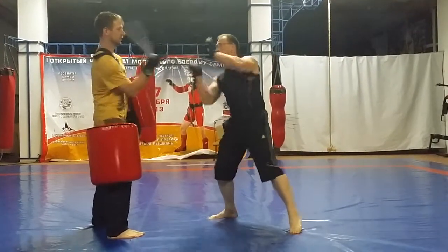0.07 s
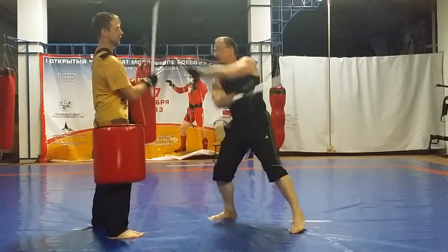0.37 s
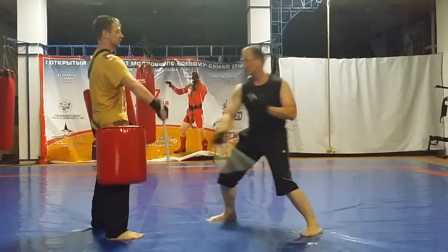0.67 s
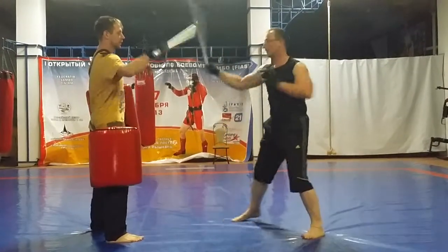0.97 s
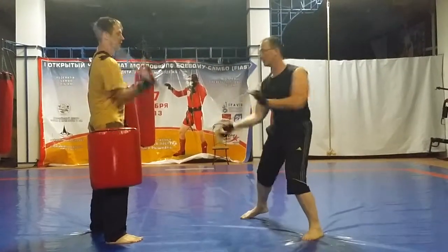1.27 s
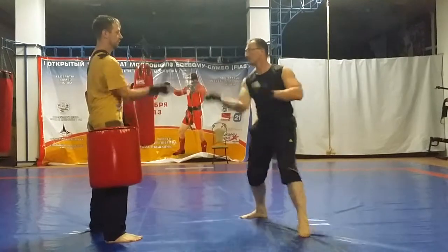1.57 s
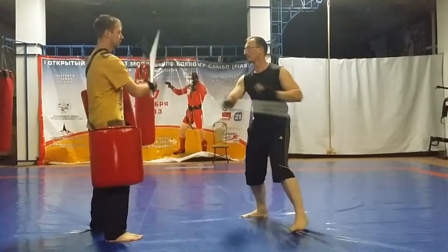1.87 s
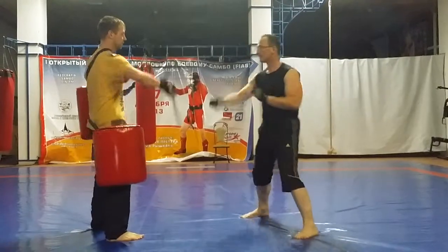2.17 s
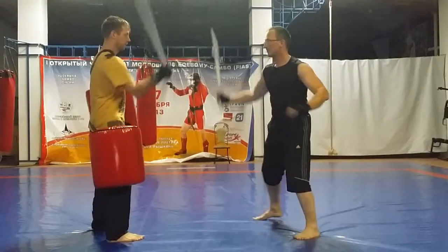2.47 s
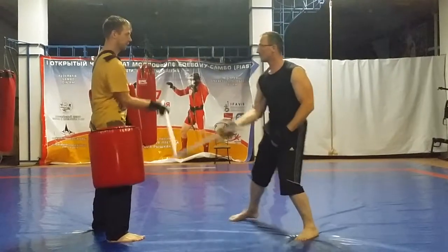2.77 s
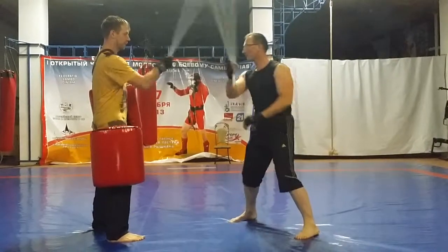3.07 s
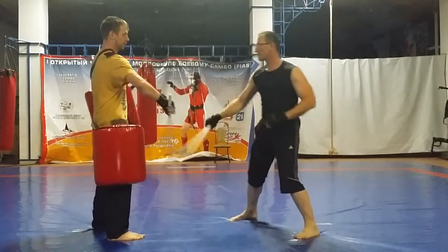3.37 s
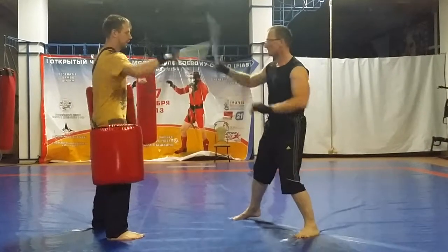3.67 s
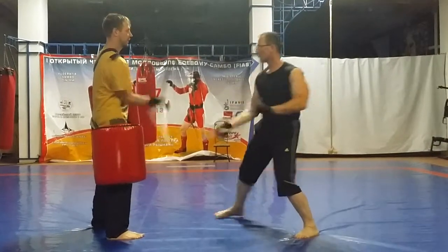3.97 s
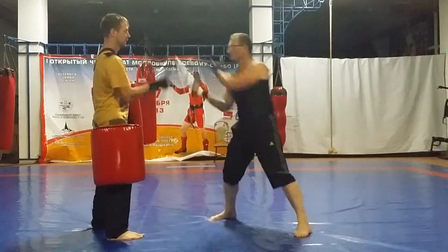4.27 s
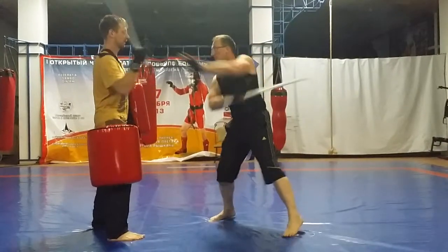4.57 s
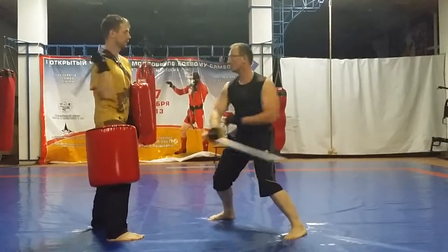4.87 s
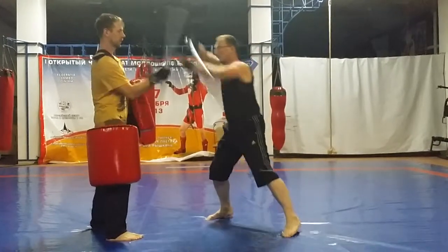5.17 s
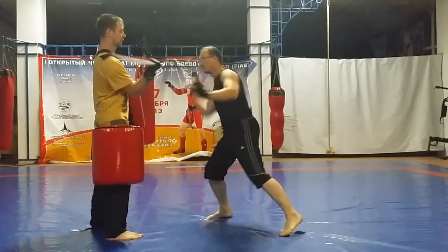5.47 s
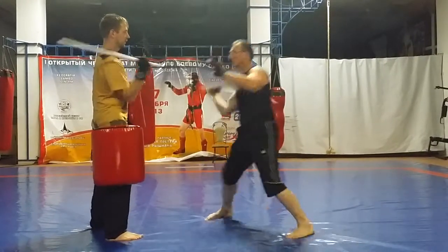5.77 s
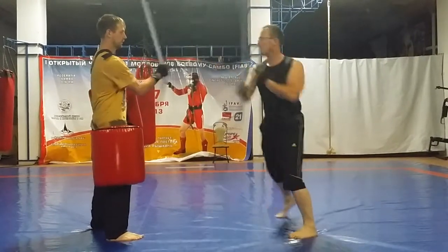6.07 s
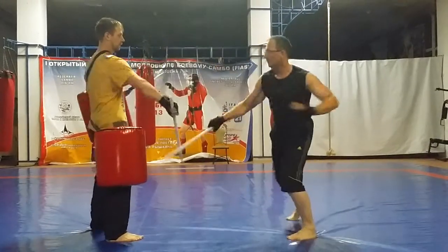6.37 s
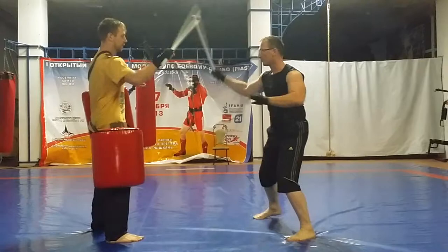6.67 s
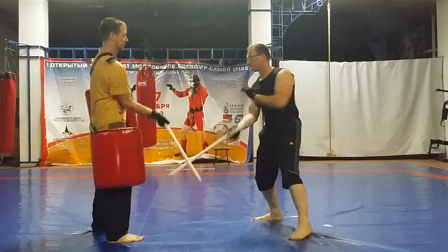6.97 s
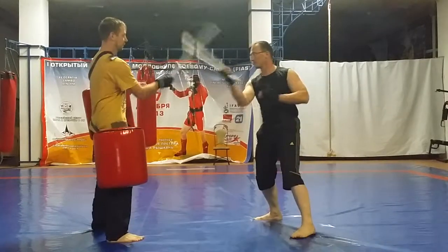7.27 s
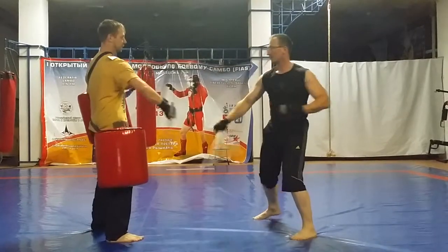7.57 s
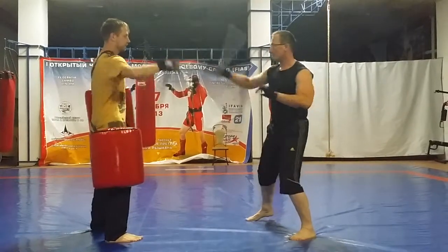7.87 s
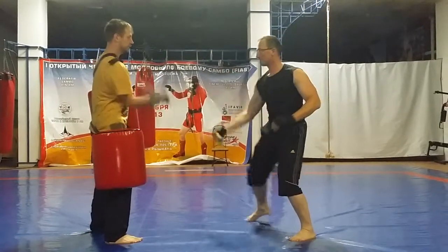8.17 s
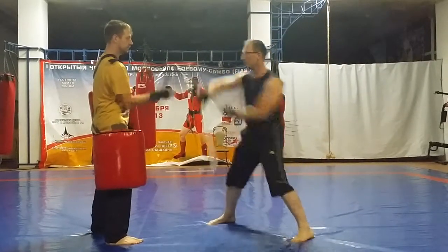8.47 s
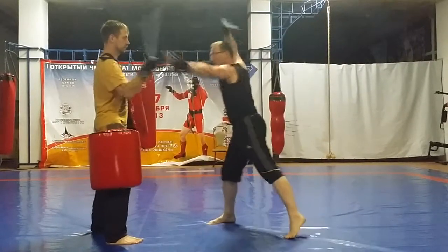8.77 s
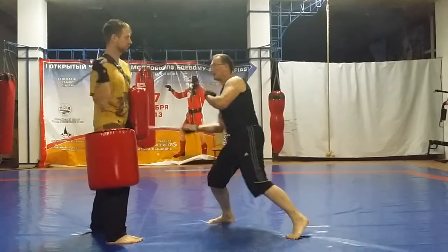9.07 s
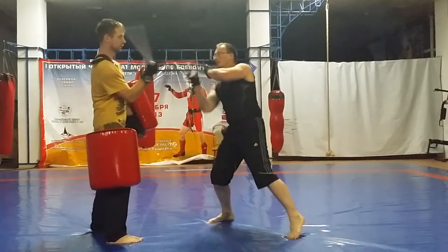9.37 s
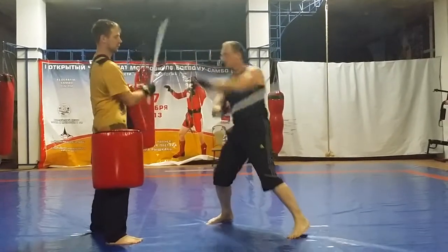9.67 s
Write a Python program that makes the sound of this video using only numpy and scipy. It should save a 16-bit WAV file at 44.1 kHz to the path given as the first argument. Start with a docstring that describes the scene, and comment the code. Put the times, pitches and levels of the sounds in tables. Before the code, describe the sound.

A stick drill is already under way in a large, echoing gym, opening on the fading echo of a blow to a pad. Wooden sticks clack at 0.2 seconds, and a louder slap and thump on vinyl-covered foam follows at 0.6. From 1.0 to 4.4 seconds the sticks clack about three times a second, each a sharp crack with a brief knock and ring, varying in pitch and strength. Heavy pad blows land at 4.8 and 5.6 seconds, with one clack between them. The quick clacking resumes from 6.0 to 8.6 seconds, followed by a boomier pad thud at 9.0 and a last clack at 9.5. Every hit dies away in the hall over one to two seconds, the thuds leaving a low hum. Bare feet pat softly on mats now and then, over a faint, steady rush of air.

```python
"""Wooden sticks clack about three times a second as two people drill in a large, echoing gym.
Each clack is a sharp crack where the sticks touch, plus a short knock and ring as the wood bends.
Now and then a blow lands on a body pad: its vinyl cover slaps and its foam thumps.
Each blow bounces off the floor and pillars, then dies away in the hall.
Bare feet pat softly on the mats, over the faint rush of the building's air."""
import sys
import numpy as np
from scipy import signal
from scipy.fft import rfft, irfft, next_fast_len
from scipy.io import wavfile

SR = 44100
rng = np.random.default_rng(int(sys.argv[2]) if len(sys.argv) > 2 else 0)


def transcribe(signal):
    """Save signal, clipped to [-1, 1], as a 16-bit WAV file at the path in sys.argv[1]."""
    frames = np.atleast_2d(signal).T
    limited = np.clip(frames, -1, 1)
    pcm = np.round(limited * 32767).astype(np.int16)
    wavfile.write(sys.argv[1], SR, pcm)


N = 428652
LEAD = round(0.5 * SR)   # extra samples before time zero: the drill is already under way
BLOW_T, HALL_T = np.arange(SR // 8) / SR, np.arange(2 * SR) / SR   # seconds since a blow


def sticks():
    """Two sticks meet, crack, knock and ring. Returns the close sound and what it sends to the hall."""
    # Stick on stick. Each row: start in seconds, meeting place, strength in dB, rough ring pitch in Hz,
    # extra ring in dB, extra knock in dB. The last two depend on which spots of the sticks touch.
    clacks = [(0.2051, "close", -26.5, 2200, 2.5, -1.5), (1.0238, "high", -37, 2190, 8, -10),
              (1.4276, "low", -25.5, 2260, -3, -9.5), (1.7351, "high", -28, 1800, 6.5, -7.5),
              (2.0764, "side", -35, 2390, -3, -17), (2.3629, "high", -33, 2300, 4, -2),
              (2.7193, "low", -28, 2530, 5.5, -8.5), (3.0661, "high", -31, 2340, 7, -3),
              (3.436, "side", -31.5, 2220, -0.5, -13), (3.7432, "high", -31.5, 2570, 6, -3.5),
              (4.0807, "low", -31, 1920, 7, -8), (4.404, "high", -34, 2080, 6.5, 0),
              (5.2209, "close", -33.5, 1920, 1.5, -9), (6.0241, "high", -28.5, 1980, 8, -6),
              (6.3824, "side", -32, 2400, -1, -8.5), (6.6993, "high", -30.5, 2030, 5, -15),
              (7.0145, "low", -26.5, 1970, 3.5, -14), (7.303, "close", -29, 2010, -3, -4),
              (7.6581, "side", -28.5, 2240, -0.5, -11.5), (7.9615, "high", -28.5, 2550, 6.5, -1),
              (8.3161, "low", -28.5, 2320, 6.5, -5.5), (8.6475, "close", -34.5, 1920, 2.5, -9),
              (9.4971, "close", -29, 2230, 0, -2)]
    # The hand-damped sticks bend in low tones (the knock) and higher tones (the ring).
    # Each row: pitch in Hz, level in dB, seconds to fade by 60 dB (called t60).
    knock_modes = [(660, 5.5, 0.045), (732, 8.5, 0.038), (950, -2, 0.043)]
    ring_modes = [(1387, -2, 0.035), (1920, 5.5, 0.013), (2210, 12.5, 0.023), (2530, 6.5, 0.023),
                  (3400, -1, 0.024), (4120, 4, 0.02)]
    # For each meeting place: how strong the crack of the contact is, in dB.
    crack_db = {"close": 12.5, "high": 9.5, "low": 11.5, "side": 11}
    # Floor and pillar echoes by meeting place. Each row: delay in seconds, wood in dB, crack in dB.
    bounces = {"close": [(.0097, -3.5, -6.5), (.0135, -15, -10), (.0332, -7, -8.5)],
               "high": [(.0090, -19, -10.5), (.0178, -6, -15), (.0230, -6, -6), (.0335, -23, -8)],
               "low": [(.0122, -2, -7.5), (.0168, -4.5, -6), (.0360, -13, -26), (.0400, -16, -10)],
               "side": [(.0115, 2.5, -18), (.0152, -7, -7.5), (.0350, -13, -14)]}
    # The crack as it fills the hall. Each row: frequency in Hz, level in dB.
    crack_tail = [(1000, -68), (2500, -4), (4200, -6), (5600, -9), (7000, -0.5), (7900, 2), (9000, -1),
                  (11000, -4.5), (14000, -10), (16000, -25)]
    usual_db, close_share = -30, 0.74   # a harder clack gains less close by than in the hall
    near, sent = np.zeros((2, LEAD + N)), []
    for s, place, db, hz, ring_db, knock_db in clacks:
        knock = from_db(knock_db) * wood(knock_modes, rng.uniform(1.0, 1.32), low_hz=516)
        body = knock + from_db(ring_db) * wood(ring_modes, hz / 2200, low_hz=1280, spread_db=1)
        crack = snap(hiss_db=-18, hiss_t60=0.011, chatter_db=-28, chatter_t60=0.035)
        crack *= from_db(crack_db[place])
        echoes = sum(echo(body, delay, body_db) + echo(crack, delay, top_db)
                     for delay, body_db, top_db in bounces[place])
        close_db = usual_db + close_share * (db - usual_db)
        add(near, s, from_db(close_db) * (body + crack + echoes))
        tail = ring_tail(hz, lift_db=1.5, width_octaves=0.067)
        sent.append(dict(s=s, db=db - 0.96, spectrum=tail,
                         build_s=0.025, early_db=-22, early_t60=0.092))
        sent.append(dict(s=s, db=db + 1.23, spectrum=crack_tail,
                         build_s=0.025, early_db=-24, early_t60=0.11))
    return near, sent


def wood(modes, stretch, low_hz, spread_db=0):
    """A struck stick bends in several tones; each gains spread_db per octave from the strongest."""
    hz, db, t60 = np.transpose(modes)
    db = db + spread_db * np.abs(np.log2(hz / hz[np.argmax(db)]))
    stretch = stretch * (1 + 0.026 * rng.standard_normal((len(modes), 1)))
    both = np.array([ring(np.transpose([hz, db, t60]), stretch, uneven_db=3.5) for _ in range(2)])
    return unit_blow(signal.sosfilt(signal.butter(2, low_hz, "high", fs=SR, output="sos"), both))


def snap(hiss_db, hiss_t60, chatter_db, chatter_t60):
    """The crack: a few hard touches within about two milliseconds, then the fine buzz of the wood."""
    # The sticks touch, chatter and part. Each row: seconds after the first touch, level in dB.
    contacts = [(0, -10.5), (.0007, -14.5), (.0015, -5)]
    # The tone of the crack. Each row: frequency in Hz, level in dB.
    crack_spectrum = [(150, -23.5), (500, -25), (1500, -2), (3000, -7), (4500, -2), (5700, -6),
                      (7200, -1.5), (8400, 4), (9800, -6.5), (11500, -12.5), (14000, -9.5), (16000, -79)]
    fade = from_db(hiss_db - 60 * BLOW_T / hiss_t60) + from_db(chatter_db - 60 * BLOW_T / chatter_t60)
    touches = rng.standard_normal((2, len(BLOW_T))) * fade
    for s, db in contacts:
        arrival_s = s * rng.uniform(0.7, 1.3) + rng.uniform(0, 0.0001, 2)
        touches[[0, 1], (arrival_s * SR).astype(int)] += from_db(db) * rng.choice([-1, 1])
    return unit_blow(colour(touches, crack_spectrum))


def ring_tail(hz, lift_db, width_octaves):
    """The hall rings a little more at the pitch of the clack that feeds it."""
    # The ring as it fills the hall. Each row: frequency in Hz, level in dB.
    spectrum = [(150, -82), (400, -21), (600, -8), (1000, -2), (1500, -1), (2100, 4), (2700, -1), (3500, 0),
                (4500, -4), (6500, -16), (10000, -43)]
    grid = np.geomspace(150, 10000, 50)
    lift = lift_db * np.exp(-(np.log2(grid / hz) / width_octaves) ** 2)
    return np.transpose([grid, at_hz(spectrum, grid) + lift])


def pads():
    """A stick slaps the vinyl and drives the foam in. Returns the close sound and the hall's share."""
    # Stick on pad. Each row: start in seconds, which pad, strength in dB, extra slap in dB
    # (more for a flat landing).
    thuds = [(-0.17, "back", -4.5, 1.0), (0.597, "hip", -0.5, -1.5), (4.7605, "hip", 0.5, 1),
             (5.6005, "back", 0.7, -2.13), (9.0396, "back", -0.5, 1.3)]
    # The hip pad faces the microphones; the back pad faces the hall and echoes more. Each row, all
    # in dB: thump, slap, first echoes, early scatter, thump in the hall, slap in the hall.
    pad_levels = {"hip": (-17.5, -14.5, -15, 20, -30, -27.5), "back": (-13.5, -15, -3.6, -12, -19, -16)}
    # Tones of the foam and cover. Each row: pitch in Hz, level in dB, seconds to fade by 60 dB.
    pad_modes = [(72, -54, .08), (137, 9, 0.13), (224, 32.5, 0.035), (316, 10.5, 0.12)]
    # Standing waves, the low hum that a thump leaves in the hall. Same columns as the pad's tones.
    hall_modes = [(122, -8, 1.1), (194, -11, 1.0)]
    # Floor and pillar echoes. Each row: delay in seconds, level in dB.
    bounces = [(0.0112, -7.5), (0.0156, -1.5), (0.0228, -19), (0.0349, -7), (.0410, -41), (.0560, -40)]
    # The slap close by, then slap and thump in the hall. Each row: frequency in Hz, level in dB.
    slap_spectrum = [(150, -20), (400, -4), (850, 7), (1400, 0.5), (2000, -2), (2800, -14), (4200, -10.5),
                     (6000, -12), (8300, -9), (11000, -16), (15000, -25)]
    slap_tail = [(150, -34), (350, -5), (700, 1), (1200, -2.5), (2000, -7.5), (2700, -14), (4000, -13.5),
                 (5500, -13.5), (8000, -12), (10000, -15.5), (14000, -18.5), (16000, -35)]
    thump_tail = [(30, -24), (65, -9), (95, -6), (125, 5.5), (180, 0), (260, -5), (340, -1), (500, -8.5),
                  (1000, -47), (3000, -55)]
    low_cut = signal.butter(2, 70, "high", fs=SR, output="sos")
    swell = 1 - np.exp(-HALL_T / 0.17)
    near, sent = np.zeros((2, LEAD + N)), []
    for s, pad, strength_db, flat_db in thuds:
        thump_db, slap_db, echo_db, scatter_db, thump_hall_db, slap_hall_db = pad_levels[pad]
        foam = signal.sosfilt(low_cut, ring(pad_modes, stretch=1, uneven_db=4))
        thump = -from_db(thump_db) * unit_blow(foam)
        vinyl = burst(slap_spectrum, t60=0.02, chatter_db=-52, chatter_t60=0.026)
        slap = from_db(slap_db + flat_db) * vinyl
        echoes = sum(echo(thump + from_db(2.0) * slap, delay, db + echo_db) for delay, db in bounces)
        add(near, s, from_db(strength_db) * (thump + slap + echoes))
        boom_db, wash_db = strength_db + thump_hall_db, strength_db + flat_db + slap_hall_db
        for hz, db, t60 in hall_modes:
            fade = from_db(boom_db + db - 60 * HALL_T / t60)
            add(near, s, fade * swell * np.sin(2 * np.pi * hz * HALL_T))
        sent.append(dict(s=s, db=boom_db, spectrum=thump_tail,
                         build_s=0.014, early_db=scatter_db, early_t60=0.12))
        sent.append(dict(s=s, db=wash_db, spectrum=slap_tail,
                         build_s=0.045, early_db=scatter_db, early_t60=0.15))
    return near, sent


def feet():
    """Bare soles land on the mat with soft, low pats."""
    # Footsteps. Each row: start in seconds, level in dB.
    steps = [(1.434, -39), (1.527, -40), (2.144, -41.5), (2.881, -43), (4.185, -49), (6.955, -44),
             (7.776, -51), (8.443, -44)]
    # The tone of a pat. Each row: frequency in Hz, level in dB.
    spectrum = [(30, -43), (70, -1), (200, -15), (400, -22), (1500, -12), (8000, -39)]
    out = np.zeros((2, LEAD + N))
    for s, db in steps:
        pat = burst(spectrum, t60=0.3, chatter_db=-18, chatter_t60=0.66)
        add(out, s, from_db(db) * pat[0])
    return out


def echo(blow, delay, db):
    """One bounce of a blow; it reaches the two microphones at slightly different times."""
    out = np.zeros_like(blow)
    for channel in range(2):
        lag = max(1, round((delay + rng.uniform(-0.000052, 0.0001)) * SR))
        out[channel, lag:] = from_db(db) * blow[channel, :-lag]
    return out


def hall(blows, uneven_db):
    """Countless echoes blur into noise: each blow builds up, sheds its early scatter and dies away."""
    # How long the hall rings. Each row: frequency in Hz, seconds to fade by 60 dB.
    fade_times = [(60, 1.36), (130, 0.95), (300, 1.06), (700, 1.3), (1400, 1.86), (2200, 2), (4000, 1.54),
                  (8000, 1.02), (11000, 0.51), (15000, 0.082)]
    # How alike left and right sound. Each row: frequency in Hz, likeness from 0 to 1.
    likeness = [(100, 1), (250, 0.86), (500, 0.57), (1000, .05), (3000, 0.024), (10000, 0.027)]
    mid, side = rfft(rng.standard_normal((2, N)))
    hz = np.arange(len(mid)) * SR / N
    alike = np.clip(at_hz(likeness, hz), 0, 1)
    noise = np.sqrt((1 + alike) / 2) * mid + np.sqrt((1 - alike) / 2) * side * [[1], [-1]]
    # Each frequency band gets its own loudness curve.
    edges = np.concatenate([np.geomspace(32, 900, 12)[:-1], np.geomspace(900, 16500, 26)])
    centres, widths = np.sqrt(edges[:-1] * edges[1:])[:, None], np.diff(edges)[:, None]
    step = 64   # samples between loudness updates
    t = np.arange(0, N + step, step) / SR
    power = 0
    for s, db, spectrum, build_s, early_db, early_t60 in map(dict.values, blows):
        age = np.maximum(t - s, 0)
        share = from_db(2 * at_hz(spectrum, centres)) * widths
        build_up = 1 - np.exp(-(age / build_s) ** 2)
        scatter = 1 + from_db(early_db - 60 * age / early_t60)
        fade = from_db(-60 * age / at_hz(fade_times, centres))
        level = from_db(db + uneven_db * rng.standard_normal(centres.shape))
        power = power + share / share.sum() * (level * build_up * scatter * fade) ** 2
    out = 0
    for low, high, band_power in zip(edges, edges[1:], power):
        band = irfft(noise * ((hz >= low) & (hz < high)), N)
        gain = np.sqrt(band_power * SR / 2 / (high - low))
        out = out + band * np.repeat(gain, step)[:N]
    return out


def air(level_db):
    """The building's air makes a faint, steady rush."""
    # The tone of the rush. Each row: frequency in Hz, level in dB.
    spectrum = [(25, -16), (60, 6.5), (130, -6.5), (200, 9.5), (260, -5), (320, 8), (500, -12), (1000, 1),
                (3000, 1), (8000, -4), (14000, -77)]
    both, left, right = colour(rng.standard_normal((3, N)), spectrum)
    rush = both + 0.6 * np.array([left, right])
    return from_db(level_db) * rush / rush.std()


def ring(modes, stretch, uneven_db):
    """Fading tones, each struck with a random strength; stretch multiplies their pitches."""
    hz, db, t60 = np.transpose(modes)[:, :, None]
    strength = db + uneven_db * rng.standard_normal(db.shape)
    fade = from_db(strength - 60 * BLOW_T / t60)
    return np.sum(fade * np.sin(2 * np.pi * hz * stretch * BLOW_T), axis=0)


def burst(spectrum, t60, chatter_db, chatter_t60):
    """The noise of a sudden contact and its brief chatter, different at each microphone."""
    fade = from_db(-60 * BLOW_T / t60) + from_db(chatter_db - 60 * BLOW_T / chatter_t60)
    return unit_blow(colour(rng.standard_normal((2, len(BLOW_T))) * fade, spectrum))


def from_db(db):
    """Turn decibels into a number to multiply by."""
    return 10 ** (np.asarray(db) / 20)


def at_hz(points, hz):
    """Read between a table's rows, with every octave equally wide."""
    f, value = np.transpose(points)
    return np.interp(np.log(np.maximum(hz, 1)), np.log(f), value)


def colour(x, spectrum):
    """Shape a sound's tone with rows of frequency in Hz and gain in dB."""
    n = 2 * next_fast_len(x.shape[-1])
    cepstrum = irfft(np.log(from_db(at_hz(spectrum, np.arange(n // 2 + 1) * SR / n))))
    # Fold the filter forward in time (minimum phase), so nothing sounds before the blow.
    cepstrum[1:n // 2] *= 2
    cepstrum[n // 2 + 1:] = 0
    return irfft(rfft(x, n) * np.exp(rfft(cepstrum)), n)[..., :x.shape[-1]]


def unit_blow(x):
    """Give a blow the energy of 6 milliseconds of sound at level 1."""
    return x / np.sqrt(np.sum(x ** 2, axis=-1, keepdims=True) / (0.006 * SR))


def add(track, s, sound):
    """Mix a sound into a track, starting at s seconds."""
    start = LEAD + round(s * SR)
    part = track[..., start:start + sound.shape[-1]]
    part += sound[..., :part.shape[-1]]


def scene():
    """Sticks, pads and feet, the hall that answers them, and its steady air."""
    clacks, clack_tails = sticks()
    thuds, thud_tails = pads()
    near = (clacks + thuds + feet())[:, LEAD:]
    return near + hall(clack_tails + thud_tails, uneven_db=1.96) + air(level_db=-57)


def record(dry):
    """The right microphone is mostly the more sensitive; peaks are rounded and the top treble is cut."""
    # Balance of the two microphones. Each row: frequency in Hz, left minus right in dB.
    balance = [(60, 1.5), (110, -3.5), (200, -2), (380, -2), (700, -2.5), (1290, -4.5), (2380, -1.5),
               (4400, -1), (8120, -4.5), (15000, -3.5)]
    ceiling, stop_hz = 1.2, 15800
    left = colour(dry[0], [(hz, db / 2) for hz, db in balance])
    right = colour(dry[1], [(hz, -db / 2) for hz, db in balance])
    rounded = ceiling * np.tanh(np.array([left, right]) / ceiling)
    return signal.sosfilt(signal.cheby2(14, 60, stop_hz, fs=SR, output="sos"), rounded)


dry = scene()
out = record(dry)
transcribe(out)
```